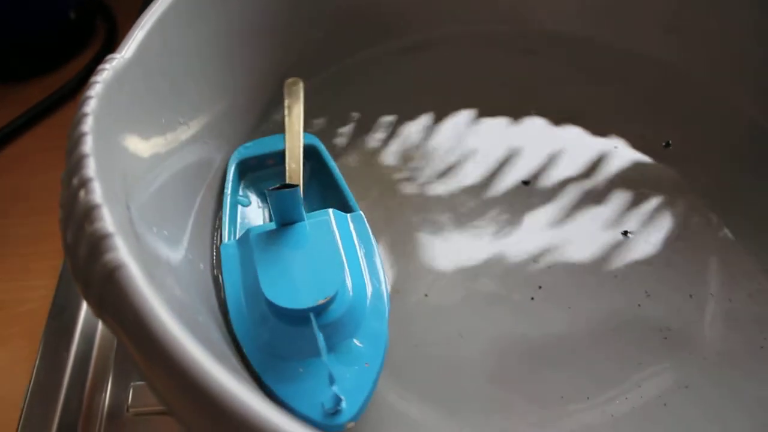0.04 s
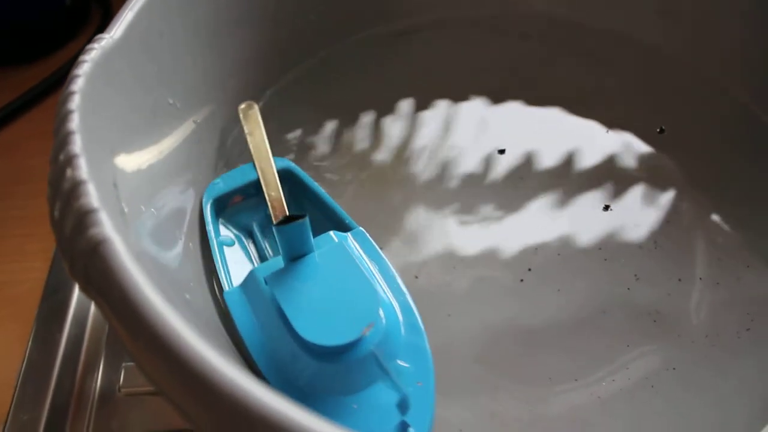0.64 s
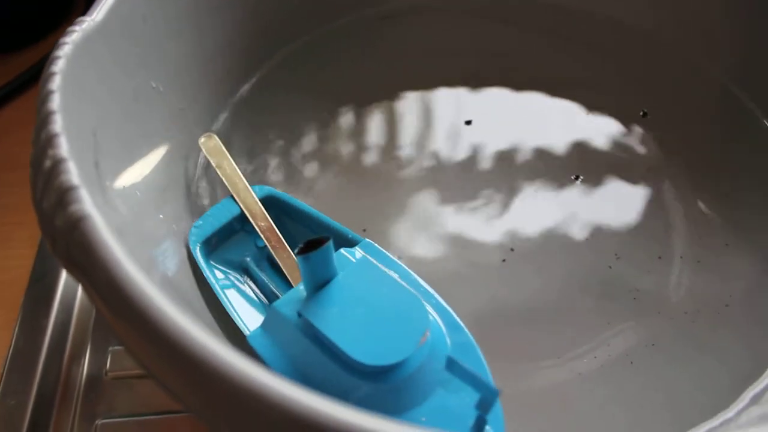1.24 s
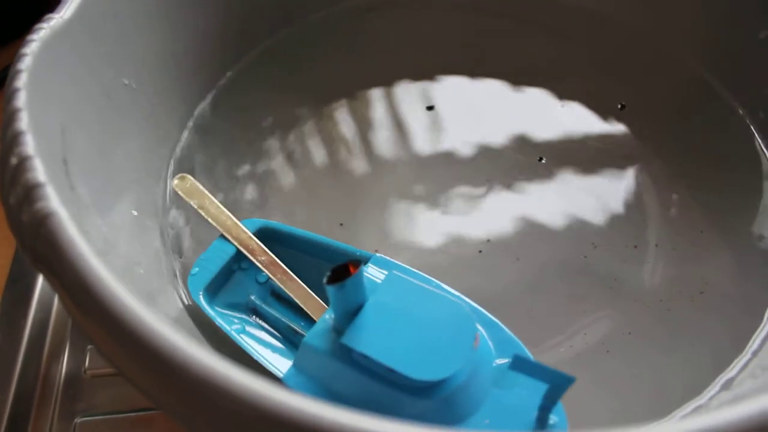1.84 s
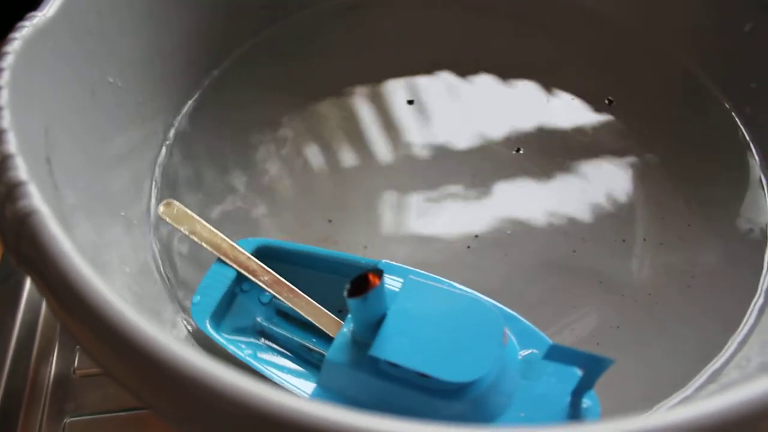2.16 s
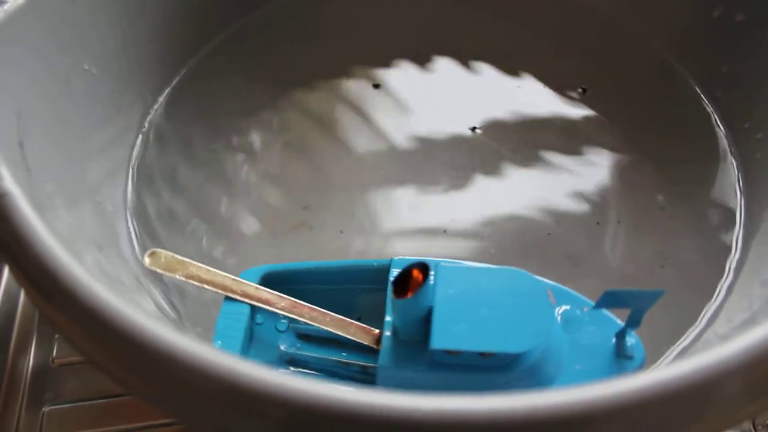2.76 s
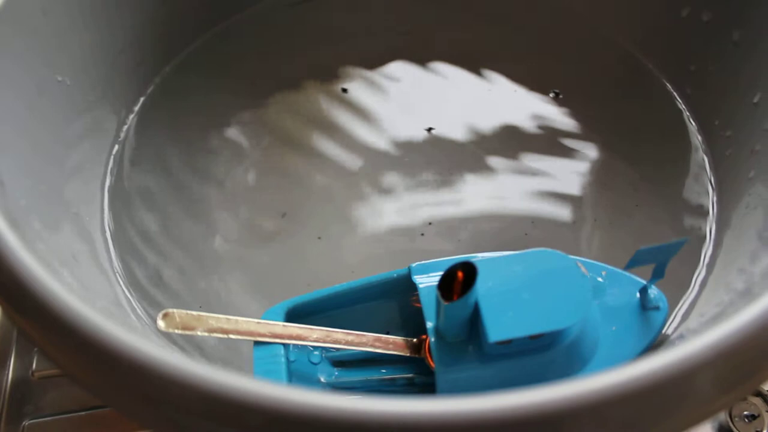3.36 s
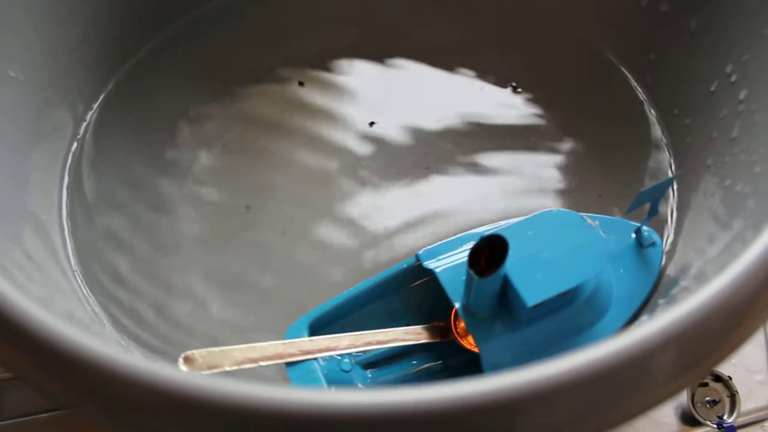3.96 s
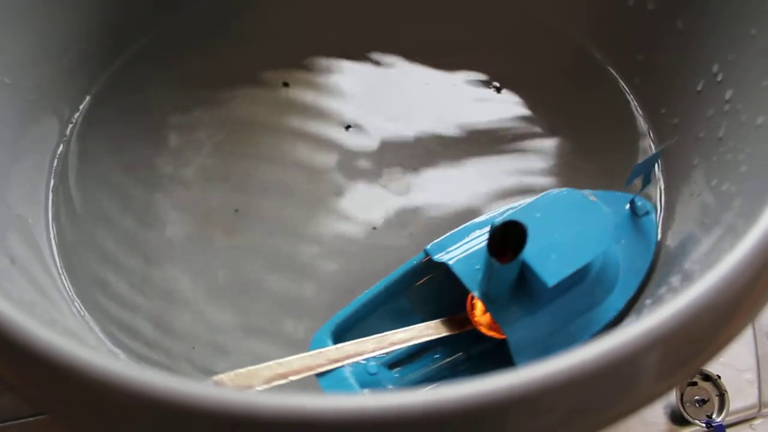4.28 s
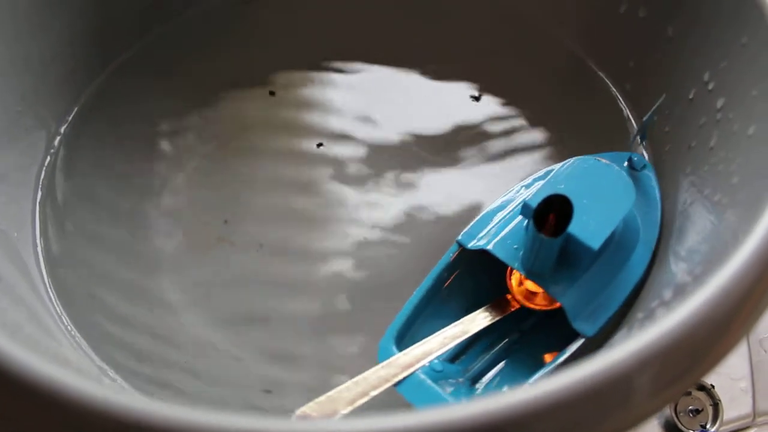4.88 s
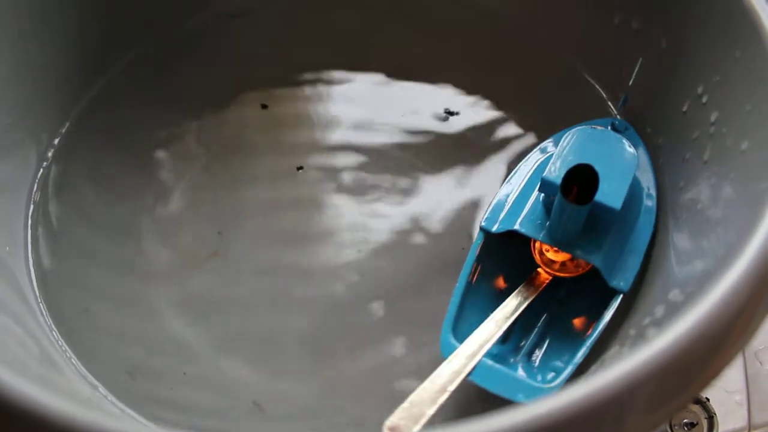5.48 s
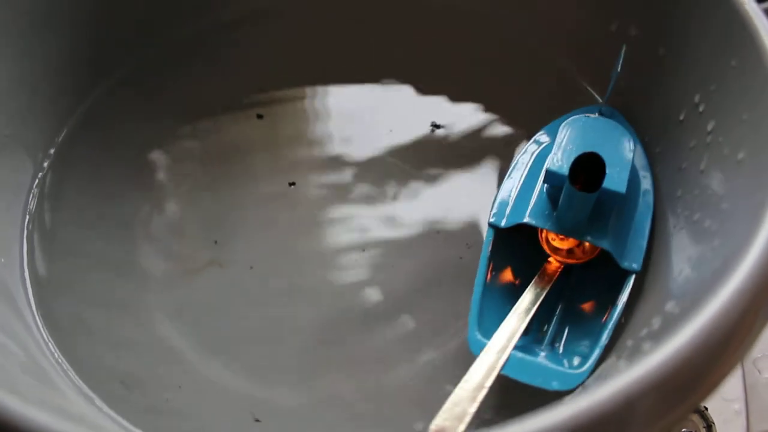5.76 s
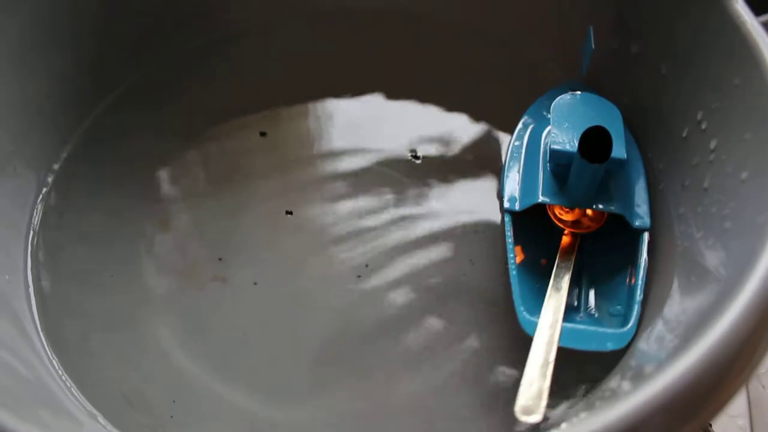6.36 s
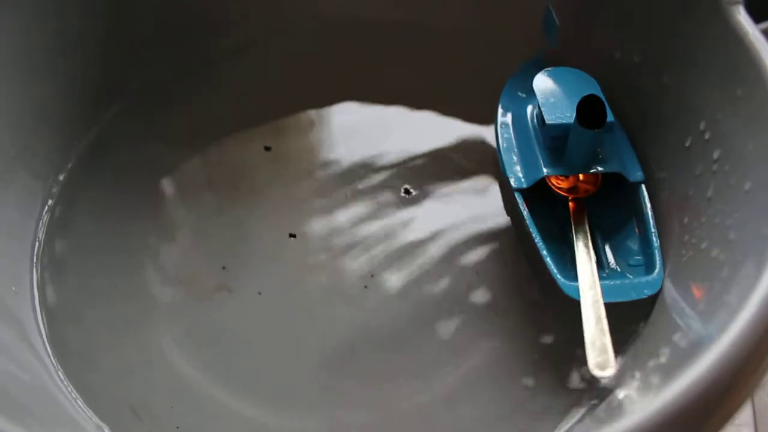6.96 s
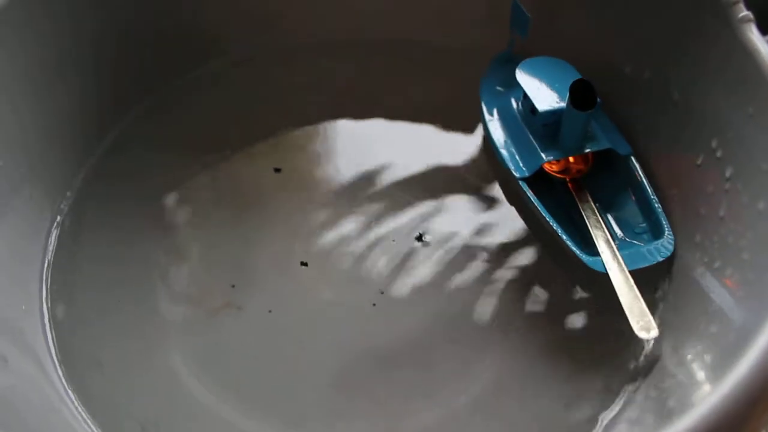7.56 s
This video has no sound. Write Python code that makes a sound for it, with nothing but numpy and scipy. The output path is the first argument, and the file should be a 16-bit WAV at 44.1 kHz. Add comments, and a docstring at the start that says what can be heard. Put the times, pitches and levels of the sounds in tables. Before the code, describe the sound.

Close up, a toy steam boat gives a rapid, tinny putter from start to finish. Each pulse is a sharp click followed by a softer-edged crackling knock, thin and bright with little bass. Some strokes land harder than others, and the colour drifts as the boat circles its basin. The basin adds a short ring and the small room a light echo over faint room tone.

```python
"""A candle-driven toy steam boat putters round a plastic basin of water, close up.
Water swinging in its pipes works the boiler's foil lid about 14 times a second: a sharp snap out,
then a slower buckle back. Each stroke is a knock through the hull with a bright foil crinkle on top.
The tone shifts as the boat turns; the basin and a small room throw the sound back over faint air."""
import sys
import numpy as np
from scipy import signal
from scipy.fft import rfft, irfft
from scipy.io import wavfile

SR = 44100
rng = np.random.default_rng(int(sys.argv[2]) if len(sys.argv) > 2 else 0)


def generate_wav(signal):
    """Clip the signal to [-1, 1] and save it as 16-bit WAV at the path in sys.argv[1]."""
    frames = np.transpose(np.atleast_2d(signal))
    scaled = np.clip(frames, -1, 1) * 32767
    pcm = np.round(scaled).astype(np.int16)
    wavfile.write(sys.argv[1], SR, pcm)


N = 336483
STROKE_SAMPLES, PRE_ROLL = 4096, 512  # one stroke's buffer, and the samples ahead of its nominal time
HZ = np.fft.rfftfreq(STROKE_SAMPLES, 1 / SR)

# tempo of the water column swinging in the pipes: t/s, f/Hz
PUTTER_RATE = [(0.0, 14.121), (0.47, 13.737), (0.593, 14.409), (0.913, 13.623), (1.933, 14.018),
               (1.996, 12.723), (2.611, 13.741), (2.784, 13.061), (3.32, 13.408), (3.989, 13.245),
               (4.15, 13.653), (5.343, 13.374), (6.033, 13.85), (6.095, 13.528), (6.136, 13.876),
               (7.355, 13.597), (7.52, 14.502), (7.63, 13.269)]
# hits of the snap (faint lead-in, main blow, short echo off the basin wall): offset t/s, relative size
SNAP_HITS = [(-.0045, 0.078), (-.0008, 0.9), (.00112, 0.13)]
# hits of the buckle, each bigger than the last: offset t/s, relative size
BUCKLE_HITS = [(-.0047, 0.24), (-.00283, .5), (-.00095, 0.64), (.00093, 0.84)]
# level rides as the flame wavers: t/s, snap knock level/dB, buckle knock level/dB, crinkle level/dB
FLAME_RIDES = [(0.0, -18.5, -21.5, -22.0), (0.5, -16.5, -15.5, -20), (0.75, -17.5, -19, -23),
               (1.1, -17, -17, -21), (1.68, -16, -16, -21.7), (1.9, -19.5, -21.5, -24.3),
               (2.15, -20, -17, -19.5), (2.85, -21.7, -18, -21), (3.4, -19, -16.5, -19),
               (3.85, -22.5, -17, -20.5), (4.3, -19.4, -19.5, -19.5), (5.3, -18.5, -19, -20.0),
               (6.6, -17.5, -18, -21.5), (7.63, -17.5, -15.5, -19.5)]
# accented and ghosted strokes: t/s, extra level/dB
ACCENTS = [(1.54, 2), (2.28, 3.5), (2.46, 3), (2.5, 2.5), (2.68, 4), (3.29, 2), (3.7, 4), (4.08, 3),
           (5.48, -5.5), (5.555, 2), (5.74, 3.5), (6.03, -6), (6.46, 2.5), (6.575, 2), (6.61, 1.5),
           (6.9, 3.5), (7.41, 1)]
# body of the knock, the modes of lid and boiler: f/Hz, width/Hz, snap level/dB, buckle level/dB
LID_MODES = [(902, 146, -11.5, 3), (1600, 80, 1, 1.5), (1737, 112, -7.5, 2.5), (2120, 100, -10.5, -2.5),
             (3470, 170, -15.5, -12), (5250, 350, -18, -21)]
# sparkle, the modes of the foil: f/Hz, width/Hz, snap level/dB, buckle level/dB
FOIL_MODES = [(2810, 280, -1, 0), (3548, 424, 1, 4.5), (4520, 1750, -3, -45), (5168, 176, 2, 1.5),
              (6994, 130, -3, 2.5), (8360, 144, -14, 0.5), (9450, 97, -30, -1), (10440, 125, -11, 1),
              (12300, 450, -0.5, -1)]
# the foil's tone between its modes: f/Hz, level/dB
CRINKLE_EQ = [(700, -4), (1050, -28), (1500, 3), (2200, 2), (2600, -3), (4000, -9.5), (6000, -6),
              (7700, -1.5), (9500, -8), (11500, -5), (13500, -6), (15700, -12.5)]
# weak low modes of hull and basin: f/Hz, width/Hz, level/dB
LOW_MODES = [(242.7, 13, -27.5), (319, 57.6, -25.5), (483, 46, -24), (638, 39, -18), (759, 33, -14)]
# hull tone as the boat turns: t/s, cabin f/Hz, cabin level/dB, lid level/dB, low shelf f/Hz
HULL_TONE = [(0, 1270, -1.5, -1, 893), (1.7, 1200, -1, 3, 950), (2.1, 1080, -2, -0.5, 986),
             (3.5, 1050, -2, -0.5, 1000), (4.3, 1100, -0.5, -1.5, 1060), (5.3, 1320, -0.5, -1, 1065),
             (6.1, 1260, 0.5, -2.5, 1220), (6.8, 990, 3, 3.5, 1267), (7.63, 990, 6.5, 2, 1330)]
# three modes beam as the boat turns: t/s, lid level/dB, lower foil level/dB, upper foil level/dB
MODE_BEAMS = [(0, -2, -0.5, -1), (1.2, -2, 2.5, -1), (3.3, -1, 0.5, -1.5), (4.4, 0.5, -2.5, 4),
              (5.6, 5, 1.5, 3), (6.501, 6.5, -2, -3), (7.63, 3.5, -1.5, -4)]
# ring of the basin: f/Hz, t60/s
BASIN_DECAY = [(300, 0.042), (1500, 0.015), (5000, 0.059), (15000, 0.02)]
# what the basin walls give back: f/Hz, level/dB
BASIN_EQ = [(300, 0), (1500, -9), (5000, -9), (15000, -14.5)]
# tail of the room: f/Hz, t60/s
ROOM_DECAY = [(250, 1), (1500, 0.82), (5000, 0.83), (15000, 0.12)]
# what the room gives back: f/Hz, level/dB
ROOM_EQ = [(250, -0.5), (700, -5.5), (1500, -8.5), (3000, -10), (5000, -7), (9000, -11.5), (15000, -12.5)]
# tone of the room air: f/Hz, relative level/dB
AIR_EQ = [(20, -14), (40, 6), (65, 1.5), (120, 3.5), (240, 7.5), (500, 1.5), (2000, 0), (15000, 8)]


def boiler():
    """The putter: the lid snaps out at once and buckles back by degrees."""
    snap_times, buckle_times = stroke_times()
    return snaps(snap_times) + buckles(buckle_times)


def snaps(times):
    """The lid pops outward: one main blow, its short echo off the basin wall, a fast-attack crinkle."""
    lid = [(hz, width, db) for hz, width, db, _ in LID_MODES]
    foil = [(hz, width, db) for hz, width, db, _ in FOIL_MODES]
    knocks = knock(times, SNAP_HITS, lid, slip_s=0.00008, sweep_s=0.00045)
    crinkles = crinkle(times, foil, start_s=-0.0016, rise_s=0.0021, fade_s=0.0044,
                       alike=0.25, spiky_db=1.5)
    knock_db, _, crinkle_db = follow(FLAME_RIDES, times)
    return sequence(times, knocks, crinkles, knock_db - 0.8, crinkle_db - 1.18,
                    scatter_db=0.92, crinkle_share=0.27)


def buckles(times):
    """The lid folds back: a run of growing hits and a crinkle with a softer attack."""
    lid = [(hz, width, db) for hz, width, _, db in LID_MODES]
    foil = [(hz, width, db) for hz, width, _, db in FOIL_MODES]
    knocks = knock(times, BUCKLE_HITS, lid, slip_s=0.00012, sweep_s=0.001675)
    crinkles = crinkle(times, foil, start_s=-0.0022, rise_s=0.0069, fade_s=0.0027,
                       alike=0.39, spiky_db=2.5)
    _, knock_db, crinkle_db = follow(FLAME_RIDES, times)
    return sequence(times, knocks, crinkles, knock_db - 1.8, crinkle_db - 0.64,
                    scatter_db=1.07, crinkle_share=0.22)


def stroke_times(first_snap_s=0.0224, bulged_share=0.4593):
    """One snap per swing of the water, and one buckle a set share of the cycle later."""
    t = np.arange(N) / SR
    cycles = np.cumsum(follow(PUTTER_RATE, t)[0]) / SR
    cycles -= np.interp(first_snap_s, t, cycles)
    snap_times = np.interp(np.arange(int(cycles[-1]) + 1), cycles, t)
    rate_hz = follow(PUTTER_RATE, snap_times)[0][:, 0]
    return snap_times, snap_times + bulged_share / rate_hz


def knock(times, hits, lid, slip_s, sweep_s, hit_scatter_db=3, cabin_width_hz=320):
    """A tight cluster of hits, rung through the modes of lid, cabin and basin."""
    delay, size = np.transpose(hits)
    chance = rng.standard_normal((len(times), 2, len(hits)))
    delay = delay + PRE_ROLL / SR + slip_s * chance[:, 0]
    size = size * gain_of(hit_scatter_db * chance[:, 1])
    cluster = (size[..., None] * np.exp(-2j * np.pi * delay[..., None] * HZ)).sum(1)
    # the lid tightens as it moves: through the mids, each higher octave sounds sweep_s later
    late_s = sweep_s * np.log2(np.clip(HZ, 800, 4000) / 1400)
    drive = irfft(cluster * np.exp(-2j * np.pi * np.cumsum(late_s) * HZ[1]))
    cabin_hz, cabin_db, lid_db, _ = follow(HULL_TONE, times)
    cabin = peak(cabin_hz, cabin_width_hz, cabin_db)
    body = gain_of(lid_db) ** 2 * flexing(lid, times, detune=0.038, uneven_db=1.0)
    low_end = sum(peak(*mode) for mode in LOW_MODES)
    return ring(drive, (cabin + body) * radiation(times) + low_end)


def crinkle(times, foil, start_s, rise_s, fade_s, alike, spiky_db, patterns=8):
    """A burst of tiny creases; the share `alike` gives way in much the same order stroke after stroke."""
    t = np.maximum((np.arange(STROKE_SAMPLES) - PRE_ROLL) / SR - start_s, 0)
    envelope = (1 - np.exp(-(t / rise_s) ** 2)) * np.exp(-t / fade_s)
    grain, size = rng.standard_normal((2, len(times) + patterns, STROKE_SAMPLES))
    creases = grain * gain_of(spiky_db * np.clip(size, -2, 2))
    fresh = creases[:len(times)]
    recurring = crossfades(times, patterns).T @ creases[len(times):]
    drive = envelope * (np.sqrt(alike) * recurring + np.sqrt(1 - alike) * fresh)
    sparkle = flexing(foil, times, detune=0.0059, uneven_db=2.5)
    rustle = gain_of(across_bands(CRINKLE_EQ, HZ)) ** 2
    return ring(drive, (rustle + sparkle) * radiation(times))


def flexing(modes, times, detune, uneven_db):
    """The lid never bends the same way twice, so its modes shift in pitch and level at each stroke."""
    chance = rng.standard_normal((len(modes), 2, len(times), 1))
    return sum(peak(hz * (1 + detune * pitch), width, db + uneven_db * level)
               for (hz, width, db), (pitch, level) in zip(modes, chance))


def radiation(times, shelf_db=-13, low_cut_hz=715):
    """Power gain towards the listener: three modes beam, and the small hull gives off little bass."""
    beaming = LID_MODES[0], FOIL_MODES[1], FOIL_MODES[3]
    beam_db = sum(db * peak(hz, width, 0)
                  for db, (hz, width, _, _) in zip(follow(MODE_BEAMS, times), beaming))
    shelf_hz = follow(HULL_TONE, times)[-1]
    shelf = gain_of(shelf_db) ** 2 + 1 / (1 + (shelf_hz / (HZ + 1)) ** 36)
    low_cut = 1 / (1 + (low_cut_hz / (HZ + 1)) ** 22)
    return gain_of(beam_db) ** 2 * shelf * low_cut


def sequence(times, knocks, crinkles, knock_db, crinkle_db, scatter_db, crinkle_share):
    """Lays the strokes on a track, no two equally hard; the crinkle takes a share of that unevenness."""
    accent_db = sum(db * (abs(times - s) < 0.015) for s, db in ACCENTS)
    uneven_db = (accent_db + scatter_db * rng.standard_normal(len(times)))[:, None]
    knocks = gain_of(knock_db + uneven_db) * knocks
    crinkles = gain_of(crinkle_db + crinkle_share * uneven_db) * crinkles
    track = np.zeros(N + 2 * STROKE_SAMPLES)
    for s, stroke in zip(times, knocks + crinkles):
        track[round(s * SR):][:STROKE_SAMPLES] += stroke
    return np.sqrt(0.01 * SR) * track[PRE_ROLL:][:N]  # levels are rms over 10 ms


def ring(drive, power):
    """Rings each stroke through a minimum-phase filter of this power response, at unit energy."""
    cepstrum = irfft(np.log(power + 1e-10) / 2)
    cepstrum[:, 1:STROKE_SAMPLES // 2] *= 2
    cepstrum[:, STROKE_SAMPLES // 2 + 1:] = 0
    return unit_energy(irfft(rfft(drive) * np.exp(rfft(cepstrum))))


def peak(hz, width, db):
    """Power response of a resonance with steep skirts."""
    return gain_of(db) ** 2 / (1 + ((HZ - hz) / width) ** 2) ** 2


def follow(rows, times):
    """Each automation lane of a table at these times, one row a stroke."""
    s, *lanes = np.transpose(rows)
    return [np.interp(times, s, lane)[:, None] for lane in lanes]


def across_bands(points, hz):
    """A curve read along a log-frequency axis."""
    f, value = np.transpose(points)
    return np.interp(np.log(hz + 1), np.log(f + 1), value)


def crossfades(times, count):
    """Equal-power fades from one pattern to the next as the boat moves."""
    place = times / (N / SR) * (count - 1)
    distance = abs(place - np.arange(count)[:, None])
    return np.cos(np.pi / 2 * np.minimum(distance, 1))


def gain_of(db):
    return 10 ** (np.asarray(db) / 20)


def unit_energy(x):
    return x / np.sqrt(np.sum(x ** 2, axis=-1, keepdims=True) + 1e-20)


def reflections(x, decay, eq, predelay_s, patterns):
    """Dense echoes, each band dying at its own speed; their pattern shifts as the boat moves."""
    noise = rng.choice([-1., 1.], (patterns, SR // 2))
    hz, t, bands = signal.stft(noise, SR, nperseg=128)
    t60 = across_bands(decay, hz)[:, None]
    bands = bands * gain_of(-60 * t / t60) / np.sqrt(t60)  # long and short tails carry like energy
    tails = unit_energy(signal.istft(bands, SR, nperseg=128)[1])
    colour = gain_of(across_bands(eq, np.fft.rfftfreq(SR, 1 / SR)))
    tails = irfft(rfft(tails, SR) * colour)
    sends = x * crossfades(np.arange(N) / SR, patterns)
    wet = signal.fftconvolve(sends, tails, axes=1).sum(0)
    return np.pad(wet, (round(predelay_s * SR), 0))[:N]


def room_air(rms_db=-54):
    """A faint, steady bed of room tone."""
    colour = gain_of(across_bands(AIR_EQ, np.fft.rfftfreq(N, 1 / SR)))
    noise = irfft(rfft(rng.standard_normal(N)) * colour, N)
    return gain_of(rms_db) * np.sqrt(N) * unit_energy(noise)


def scene():
    """Mono mix: the boat up front, the basin's short ring, the room's tail and the air behind."""
    boat = boiler()
    basin = reflections(boat, BASIN_DECAY, BASIN_EQ, predelay_s=0.002, patterns=9)
    room = reflections(boat, ROOM_DECAY, ROOM_EQ, predelay_s=0.0074, patterns=6)
    return (boat + basin + room + room_air())[None]


def record(dry, ceiling=0.85, high_cut_hz=15850):
    """A soft clip rounds the loudest peaks; a steep high cut trims the top."""
    rounded = dry / (1 + (dry / ceiling) ** 12) ** (1 / 12)
    high_cut = signal.firwin(511, high_cut_hz, window=("kaiser", 9), fs=SR)
    return signal.oaconvolve(rounded, high_cut[None], "same")


dry = scene()
out = record(dry)
generate_wav(out)
```